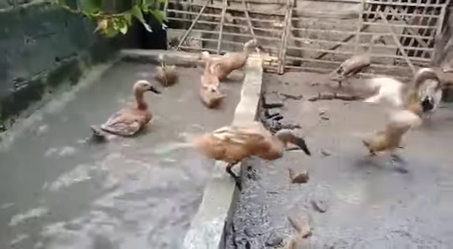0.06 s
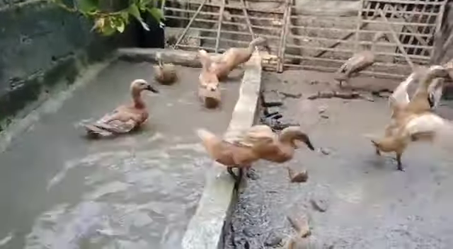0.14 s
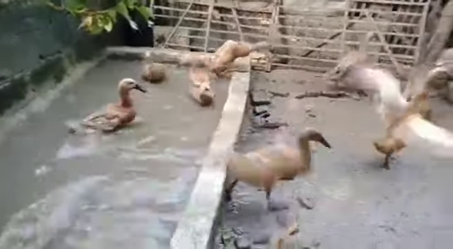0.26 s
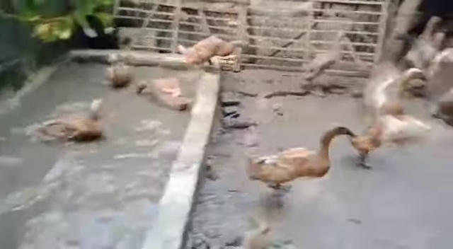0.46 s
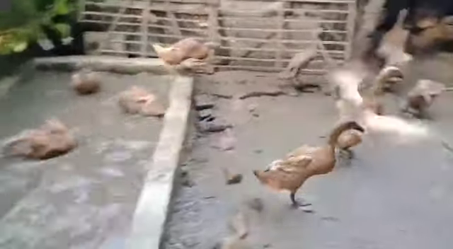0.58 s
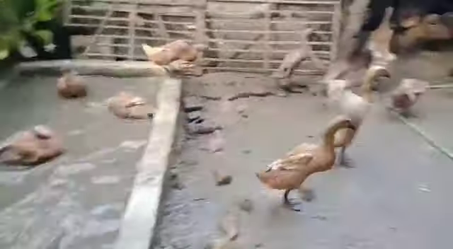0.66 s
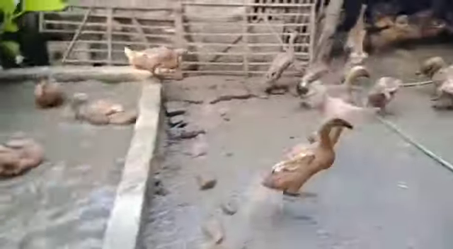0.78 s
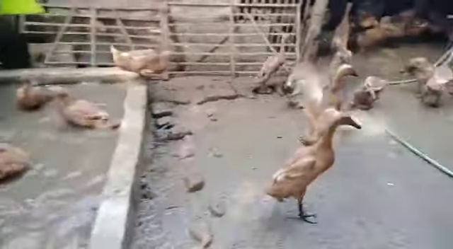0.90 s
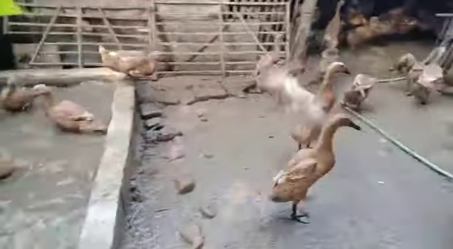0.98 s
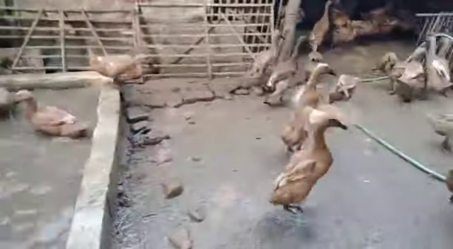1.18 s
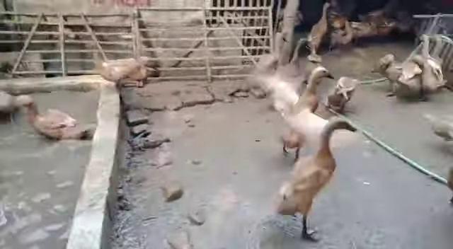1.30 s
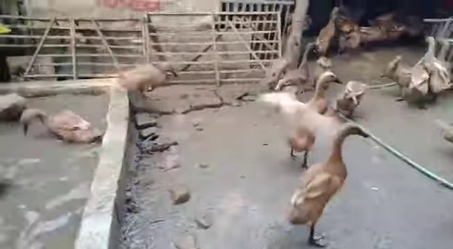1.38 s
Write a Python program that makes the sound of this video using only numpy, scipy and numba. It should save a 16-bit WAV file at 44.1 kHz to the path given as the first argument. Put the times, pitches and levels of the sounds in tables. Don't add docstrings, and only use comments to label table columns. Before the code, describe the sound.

One near duck gives a long nasal quack, hoarse then clear, after brief mutters, taps and a hollow plop; then other ducks chatter softly farther off in a concrete yard with short dull echoes and low rumble.

```python
import sys
import numpy as np
from scipy import signal
from scipy.fft import rfft, irfft, next_fast_len
from scipy.io import wavfile
from scipy.ndimage import uniform_filter1d
from numba import njit

SR = 44100
rng = np.random.default_rng(int(sys.argv[2]) if len(sys.argv) > 2 else 0)


def wav_out(sig):
    wavfile.write(sys.argv[1], SR, np.round(np.clip(np.atleast_2d(sig).T, -1, 1) * 32767).astype(np.int16))


def volts_from_db(level):
    exponent = np.asarray(level, float) / 20
    return 10 ** exponent


N = 63945


def rms_one(x):
    return x / np.sqrt(np.mean(x ** 2) + 1e-20)


def evened(x):
    power = uniform_filter1d(uniform_filter1d(x ** 2, size=600), size=600)
    return x / np.sqrt(power + 1e-12)


def in_time(rows):
    s, *columns = np.transpose(rows)
    return [np.interp(np.arange(N) / SR, s, c) for c in columns]


def drift(rate_hz):
    r = np.exp(-2 * np.pi * rate_hz / SR)
    white = rng.standard_normal(N + SR)
    return rms_one(signal.lfilter([1], [1, -2 * r, r * r], white)[SR:])


@njit
def sweep(x, w, r):
    y = np.zeros(len(x))
    for i in range(2, len(x)):
        drive = (1 - r * r) / 2 * (x[i] - x[i - 2])
        y[i] = drive + 2 * r * np.cos(w[i]) * y[i - 1] - r * r * y[i - 2]
    return y


def resonance(x, hz, width_hz):
    return sweep(x, 2 * np.pi * hz / SR * np.ones(N), np.exp(-np.pi * width_hz / SR))


# (f/Hz, level/dB)
YARD = [(40, -6), (100, 12), (700, 6), (1700, 3.5), (3200, -3.5), (6500, -21.5), (9500, -47), (15500, -44)]
YARD_DB = -43


def yard():
    out = 0
    together = drift(8.7)
    edges = 25 * 2 ** np.arange(0, 9.6, .5)
    white = rng.standard_normal((2, N + SR))
    hz, db = np.transpose(YARD)
    for k, (low, high) in enumerate(zip(edges, edges[1:])):
        sos = signal.butter(2, [low, high], "band", fs=SR, output="sos")
        band = signal.sosfilt(sos, white[k % 2])[SR:]
        band_db = np.interp(np.log(low * high) / 2, np.log(hz), db)
        flicker_db = 1.4 * together * (low > 300) + 2.2 * drift(20)
        out = out + band * volts_from_db(band_db + flicker_db)
    return volts_from_db(YARD_DB) * rms_one(out)


PEN_T60_S, PEN_DB, WALL_CUT_HZ = .18, -19, 5000


def pen(x):
    size = next_fast_len(N + SR)
    w = 2 * np.pi * np.arange(size // 2 + 1) / size
    dulling = 1 + 1j * w * SR / (2 * np.pi * WALL_CUT_HZ)
    loops = 0
    for k, lag in enumerate(rng.uniform(.008, .03, 8) * SR):
        back = volts_from_db(-60 * lag / SR / PEN_T60_S) * np.exp(-1j * w * lag) / dulling
        loops = loops + (-1) ** k * back / (1 - back)
    return volts_from_db(PEN_DB) * irfft(rfft(x, size) * loops, size)[:N]


GROUND_S, GROUND_DB = 0.000462, -28


def ground_echo(x):
    return volts_from_db(GROUND_DB) * np.interp(np.arange(N) - GROUND_S * SR, np.arange(N), x)


# (t/s, level/dB, centre f/Hz, width/octaves, t60/s)
TAPS = [(.007, -41, 4500, 0.19, .05), (.03, -61, 12000, 0.93, .03), (0.0655, -31, 2300, 1.45, 0.041),
        (.0654, -56, 12000, 1.2, .04), (.081, -45, 4700, .35, 0.049), (.130, -59, 10000, 1.3, .02),
        (.148, -37.5, 2900, .25, 0.057), (.149, -44, 3900, 0.14, 0.046), (.162, -40, 2450, .2, .05),
        (.163, -40, 3900, 0.23, 0.079), (0.194, -59, 13000, 0.65, .02), (0.223, -23.5, 1200, 2.87, 0.041),
        (0.2252, -56, 11000, 1.3, .03), (0.2626, -56.5, 10000, 1.3, .03), (.353, -62, 13000, .5, 0.041),
        (0.379, -60, 10000, 1.2, 0.017), (.612, -62, 13500, .4, .03), (0.652, -54, 11000, 1.1, 0.023),
        (.743, -35, 1200, 1.45, .03), (.775, -56, 8000, 1.04, .02), (.778, -34.5, 3400, 1.08, 0.043),
        (.7777, -53.5, 7500, 1.1, 0.052), (0.887, -63, 5500, 1.2, .02), (.988, -47, 5200, 0.17, .04),
        (1.01, -57, 7500, 0.59, .02), (1.056, -40, 4000, 0.9, 0.033), (1.0613, -62, 9500, 1.1, .03),
        (1.13, -63, 10000, 1.1, .02), (1.142, -34.5, 3300, 0.6, .04), (1.141, -48, 7800, 0.69, 0.035),
        (1.24, -60, 7000, 0.86, .02), (1.275, -60, 7000, 1.2, 0.028), (1.445, -49, 11000, 1.6, .08)]
TAP_AIR_DB = -40


def taps():
    out = np.zeros(N)
    for s, db, hz, octaves, t60 in TAPS:
        t = np.arange(N) / SR - s
        white = rng.standard_normal(N)
        edges = np.clip(hz * 2 ** (octaves * np.array([-.5, .5])), 50, .45 * SR)
        body = signal.sosfilt(signal.butter(3, edges, "band", fs=SR, output="sos"), white)
        rise = np.clip(t / .0012, 0, 1)
        fading = volts_from_db(db - 60 * np.clip(t, 0, 1) / t60)
        out += fading * rise * (rms_one(body) + volts_from_db(TAP_AIR_DB) * white)
    return out


# (t/s, level/dB, start f/Hz, rise/(Hz per s), held/s)
PLOPS = [
    (0.225, -21.5, 117.9, 99, 0.035),
]
PLOP_BEND_HZ_PER_S2 = 2000


def plops():
    out = np.zeros(N)
    for s, db, hz, rise, held in PLOPS:
        t = np.clip(np.arange(N) / SR - s, 0, None)
        turns = hz * t + rise * t ** 2 / 2 + PLOP_BEND_HZ_PER_S2 * t ** 3 / 3
        fading = volts_from_db(db - 60 * np.clip(t - held, 0, None) / .33)
        out += fading * np.clip(t / .012, 0, 1) * np.sin(2 * np.pi * turns)
    return out


def syrinx(pitch_hz, rough):
    turns = np.cumsum(pitch_hz * (1 + 0.14 * rough * drift(150))) / SR
    at = np.flatnonzero(np.diff(np.floor(turns)) > 0)
    late = (turns[at + 1] % 1) / (turns[at + 1] - turns[at])
    size = volts_from_db(5.8 * (rough * np.ones(N))[at] * rng.standard_normal(N)[at])
    pulses = np.zeros(N + 1)
    pulses[at], pulses[at + 1] = size * late, size * (1 - late)
    breath = rng.standard_normal(N) * np.exp(-2.5 * (turns % 1))
    return pulses[:N] + 0.35 * rough * breath


RISE_SHARE, EDGE_POWER = 0.44, 0.62
THROAT_FALL, BILL_RATIO = 0.074, 1.9
FAR_BEAK_DB, FAR_RASP_DB, CHEST_DB = -7, -19.5, -15


def far_call(start, length, db, pitch_hz, rough, throat_hz, bill_db, sink=0):
    u = np.clip((np.arange(N) / SR - start) / length, 0, 1)
    ramp = np.minimum(u / RISE_SHARE, (1 - u) / (1 - RISE_SHARE))
    swell = np.sin(np.pi / 2 * ramp) ** EDGE_POWER
    pitch_hz = pitch_hz * (1 + sink * (.5 - u))
    source = syrinx(pitch_hz, rough)
    throat_hz = throat_hz * (1 + (sink + THROAT_FALL * length / 0.04) * (.5 - u))
    throat = resonance(resonance(source, throat_hz, 207), throat_hz, 750)
    bill_hz = throat_hz * BILL_RATIO
    bill = resonance(resonance(source, bill_hz, 350), bill_hz, 1200)
    bill = bill - volts_from_db(FAR_BEAK_DB) * resonance(source, 2550, 200)
    bill = bill + volts_from_db(FAR_RASP_DB) * resonance(source, 4000, 700)
    chest = volts_from_db(CHEST_DB) * resonance(source, pitch_hz, 60)
    return volts_from_db(db) * swell * evened(throat - volts_from_db(bill_db) * bill + chest)


# (start t/s, length/s, level/dB, throat f/Hz, bill level/dB)
MUTTERS = [(0, 0.05, -31.5, 890, -8), (0.114, 0.028, -40, 840, 16), (0.169, 0.066, -31.5, 787, 0),
           (0.791, 0.0192, -36, 896, -11), (0.967, 0.032, -30, 604, -26), (0.979, 0.036, -32, 997, -4.5),
           (1.061, 0.045, -30.5, 923, -8), (1.146, 0.049, -29, 934, -14), (1.186, 0.047, -37, 1150, -1.5),
           (1.192, 0.07, -40.5, 465, -1), (1.378, 0.062, -40, 447, -16), (1.399, 0.082, -32.5, 1103, 4),
           (0.714, 0.054, -46.5, 800, 16), (0.269, 0.039, -34, 428, -23), (0.318, 0.12, -35.5, 272, -3),
           (0.438, 0.065, -30.5, 311, -4.5), (0.835, 0.021, -53, 960, 25)]
MUTTER_HZ, MUTTER_ROUGH = 240, .45
# (start t/s, length/s, level/dB, pitch f/Hz, throat f/Hz)
CALLS_FAR = [(1.03, 0.035, -36.5, 270, 840), (.85, .11, -52.5, 340, 2750), (1.016, 0.03, -24, 276.5, 538),
             (1.1, 0.05, -34.5, 430.2, 1270), (1.228, 0.021, -38, 400, 1980),
             (1.338, 0.064, -32.5, 414, 795), (1.352, 0.049, -31.5, 434, 1325),
             (0.0074, 0.028, -37, 410, 1690), (0.884, 0.046, -38, 294.3, 860),
             (1.363, 0.05, -34.5, 431, 1834), (1.383, 0.16, -38.5, 444.6, 2560),
             (1.392, 0.064, -47, 380, 3900)]
CALL_ROUGH, CALL_BILL_DB = .22, -14
# (start t/s, length/s, level/dB, pitch f/Hz, throat f/Hz)
SIGHS = [
    (.995, 0.029, -28, 290, 796),
    (1.158, 0.0502, -33, 420, 1270),
    (1.245, .065, -35.5, 335, 1020),
    (0.0207, .045, -38, 280, 880),
]
SINK_SHARE = .2
FAR_CUT_HZ = 7300


def flock():
    voices = np.zeros(N)
    for s, length, db, throat_hz, bill_db in MUTTERS:
        voices += far_call(s, length, db, MUTTER_HZ, MUTTER_ROUGH, throat_hz, bill_db)
    for s, length, db, pitch_hz, throat_hz in CALLS_FAR:
        voices += far_call(s, length, db, pitch_hz, CALL_ROUGH, throat_hz, CALL_BILL_DB)
    for s, length, db, pitch_hz, throat_hz in SIGHS:
        voices += far_call(s, length, db, pitch_hz, CALL_ROUGH / 2, throat_hz, CALL_BILL_DB, SINK_SHARE)
    return signal.sosfilt(signal.butter(2, FAR_CUT_HZ, fs=SR, output="sos"), voices)


THROAT_TONES_DB = [-12, 0, -.5, -15, -15]


def throat_tones(pitch_hz, rough):
    turns = np.cumsum(pitch_hz * (1 + 0.037 * rough * drift(71.0))) / SR
    tones = np.zeros(N)
    for k, db in enumerate(THROAT_TONES_DB):
        tones += volts_from_db(db) * np.sin(2 * np.pi * (k + 1) * turns)
    return rms_one(tones) * np.clip(1 - rough / .6, 0, 1)


def stack(x, table, scale):
    out = 0
    for k, (hz, width_hz, db) in enumerate(table):
        ring = resonance(resonance(x, hz * scale, width_hz), hz * scale, 3 * width_hz)
        out = out + (-1) ** (k + 1) * volts_from_db(db + 2.73 * drift(24)) * ring
    return out


# (t/s, level/dB, bill f/Hz, throat level/dB)
QUACK = [
    [(.335, -39, 1390, 3), (.339, -33, 1300, -20), (.365, -29, 1340, -18), (.377, -16.5, 1410, -21),
     (.40, -22, 1360, -7.5), (.412, -19, 1410, -21), (.43, -21.5, 1660, -9)],
    [(.44, -21.5, 1580, -9), (.452, -14, 1585, -16.5), (.482, -15, 1780, -13.5), (.505, -17, 1620, -9),
     (.53, -22, 1700, -7.5), (.565, -27, 1630, 3)],
    [(.575, -27, 1710, -4.5), (.581, -20, 1604, -10), (.625, -21.5, 1710, -6), (.645, -19.5, 1696, -4),
     (.66, -23, 1693, -2), (.68, -22.5, 1730, -3), (.70, -40.5, 1730, -3.5), (.72, -49, 1750, -3)],
]
# (t/s, f/Hz)
PITCH = [
    [(.34, 185), (.37, 194.9), (.40, 195.9), (.416, 208.1), (.434, 220), (.452, 230), (.47, 241.7),
     (.50, 244.4)],
    [(.546, 247.9), (.562, 255), (.58, 245.5), (.62, 240.6), (.63, 245.3), (.65, 270.1), (.682, 251.8),
     (.70, 231.7), (.715, 219)],
]
# (t/s, roughness/0-1)
HOARSE = [(.33, .75), (.37, .42), (.405, .3), (.425, .1), (.46, .035), (.62, .035), (.65, .09), (.68, .14),
          (.71, .3)]
# (f/Hz, width/Hz, level/dB)
UPPER = [(2187, 116, 0.5), (2586, 208, -9.5)]
# (t/s, scale of the upper resonances/ratio, their level/dB)
STRETCH = [(.34, 0.8, -9.5), (.38, .84, -4.5), (.41, 0.87, -7), (.47, 1.02, -3), (.51, 1.0, 4),
           (.56, 1.03, -4.5), (.61, .99, -7.5), (.65, 1.01, 0), (.70, 1.03, -7.5)]
# (f/Hz, width/Hz, level/dB)
HEAD = [(3860, 195, -15), (4440, 240, -26), (4920, 296, -23), (5650, 340, -30.5), (6620, 420, -34),
        (8510, 500, -44)]
# (t/s, scale of its resonances/ratio, their level/dB)
TILT = [(.34, 0.73, -4), (.38, .8, -6.5), (.42, 0.854, -1.5), (.465, 1.03, -3.5), (.52, 0.98, 2.5),
        (.565, .99, 3), (.59, 0.925, -7), (.66, 0.89, 2.5), (.71, 0.97, 1)]
THROAT_HZ, THROAT_WIDTH_HZ, BILL_WIDTH_HZ = 610, 300, 200
RASP = .03
AIR_DB, HISS_DB, HISS_HZ, HISS_WIDTH_HZ = -50.5, -31, 4300, 1930


def near_quack():
    db, bill_hz, throat_db = in_time(np.vstack(QUACK))
    pitch_hz, rough = in_time(np.vstack(PITCH))[0], in_time(HOARSE)[0]
    stretch, upper_db = in_time(STRETCH)
    tilt, head_db = in_time(TILT)

    source = syrinx(pitch_hz, rough)
    bill = resonance(resonance(source, bill_hz, BILL_WIDTH_HZ), bill_hz, 610)
    upper = volts_from_db(upper_db) * stack(source, UPPER, stretch)
    rasp = RASP * rng.standard_normal(N)
    head = volts_from_db(head_db) * stack(source + rasp, HEAD, tilt)

    throat = resonance(resonance(source, THROAT_HZ, THROAT_WIDTH_HZ), 450, 900)
    throat = np.clip(rough / .4, 0, 1) * evened(throat) + throat_tones(pitch_hz, rough)

    breath = rng.standard_normal(N + 1)
    hiss = resonance(resonance(breath[1:], HISS_HZ, HISS_WIDTH_HZ), HISS_HZ, HISS_WIDTH_HZ)
    air = volts_from_db(AIR_DB) * np.diff(breath) + volts_from_db(HISS_DB) * (1 + 3 * rough) * rms_one(hiss)

    s = np.arange(N) / SR
    opening = np.clip((s - QUACK[0][0][0]) / 0.0045, 0, 1)
    closing = np.clip((QUACK[2][-1][0] - s) / 0.0067, 0, 1)
    voice = evened(bill + upper + head) - volts_from_db(throat_db) * throat + air
    return opening * closing * volts_from_db(db) * voice


def scene():
    near = taps() + flock() + near_quack()
    mix = yard() + pen(near) + ground_echo(near) + plops() + near
    return mix[None]


def low_pass(x):
    return signal.sosfilt(signal.butter(12, 15800, fs=SR, output="sos"), x)


def record(dry):
    return low_pass(dry)


dry = scene()
out = record(dry)
wav_out(out)
```